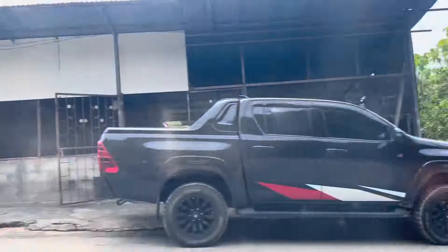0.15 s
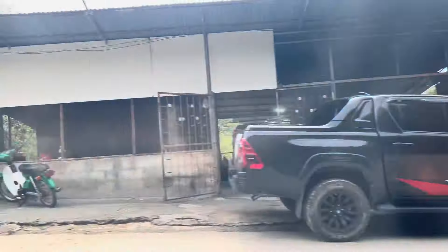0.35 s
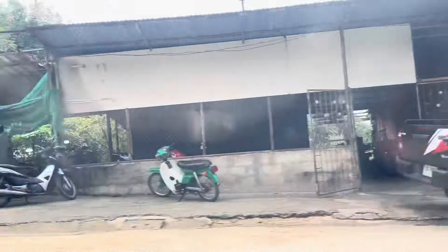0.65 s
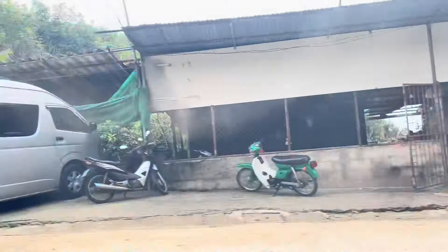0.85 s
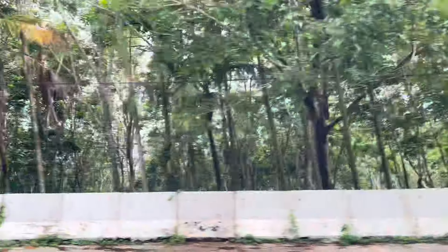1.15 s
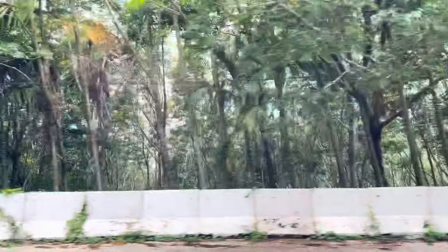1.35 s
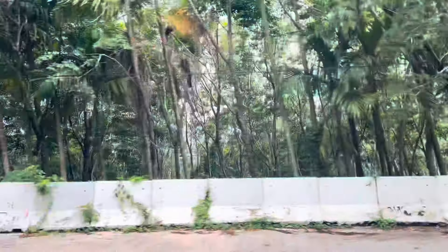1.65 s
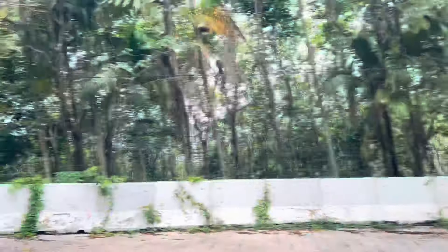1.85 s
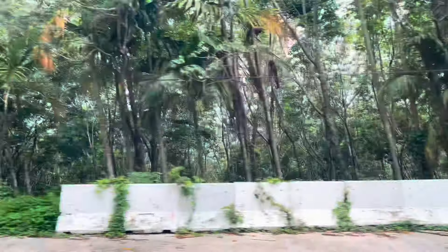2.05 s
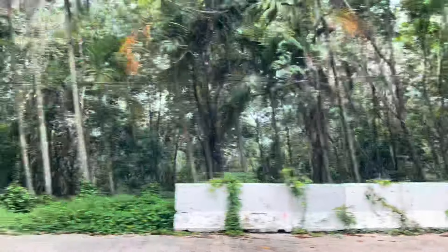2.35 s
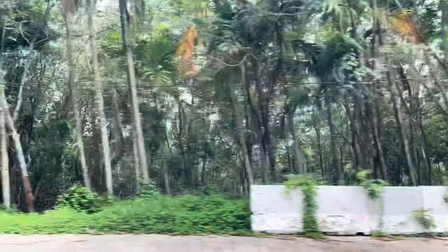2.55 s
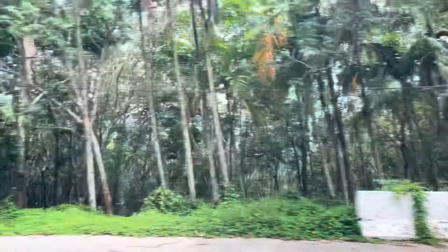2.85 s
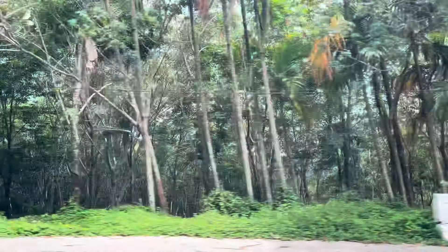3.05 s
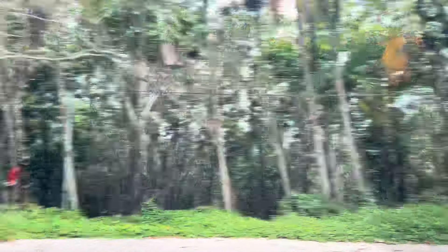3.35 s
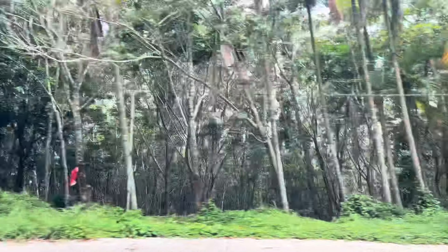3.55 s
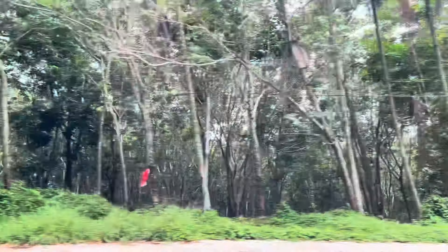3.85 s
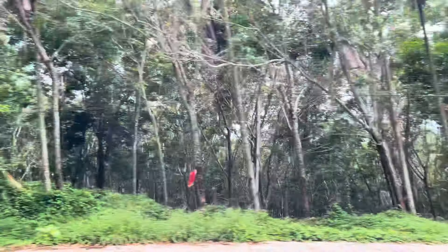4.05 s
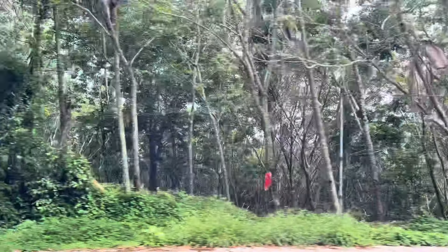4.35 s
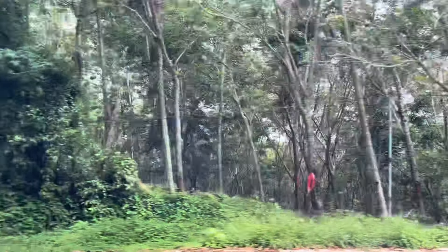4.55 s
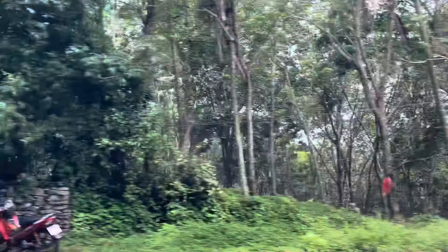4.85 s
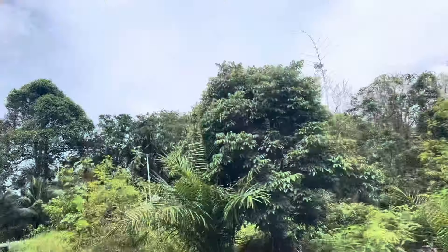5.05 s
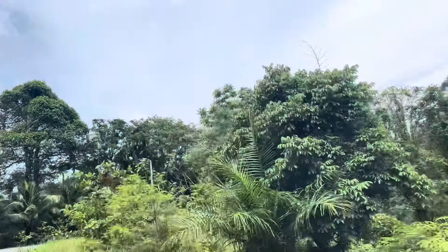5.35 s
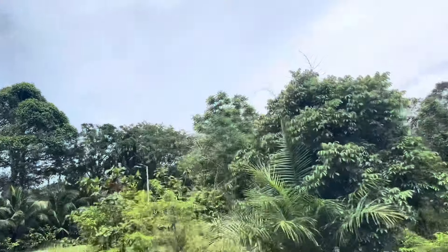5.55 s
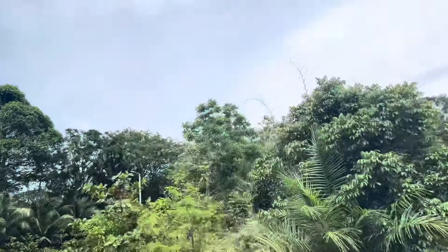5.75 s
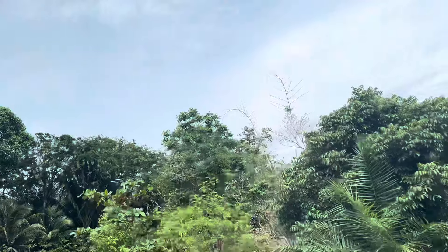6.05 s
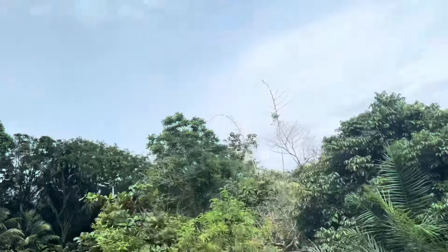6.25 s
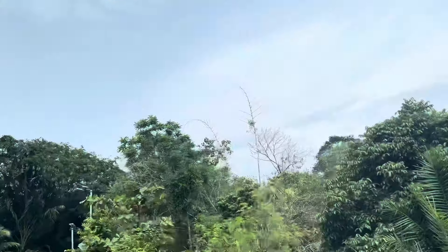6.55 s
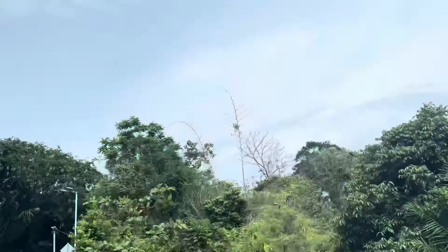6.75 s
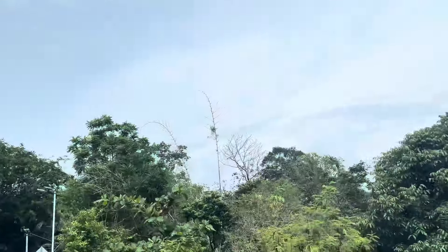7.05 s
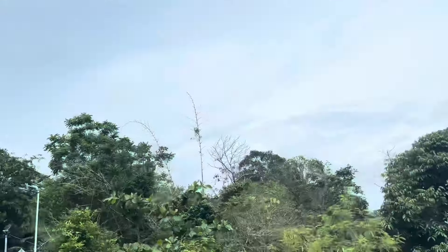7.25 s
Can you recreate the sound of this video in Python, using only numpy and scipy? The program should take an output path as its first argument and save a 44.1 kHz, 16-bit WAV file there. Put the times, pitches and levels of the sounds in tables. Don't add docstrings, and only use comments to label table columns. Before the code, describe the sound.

Bush crickets chirp in quick trills over steady cicada hiss in a forest, then a cut to low vehicle rumble with irregular knocks and rustles.

```python
import sys
import numpy as np
from scipy import signal
from scipy.fft import rfft, irfft
from scipy.io import wavfile
from scipy.ndimage import uniform_filter1d

SR = 44100
rng = np.random.default_rng(int(sys.argv[2]) if len(sys.argv) > 2 else 0)


def persist_wave(psi):
    counts = np.round(np.clip(psi, -1, 1) * 32767).astype(np.int16)
    wavfile.write(sys.argv[1], SR, np.atleast_2d(counts).T)


def boost_factor(decibels):
    exponent = np.asarray(decibels, float) / 20
    return 10 ** exponent


N = 326340
T = np.arange(N) / SR
CUT_S, CABIN_S = 4.8575, 4.8852


def band(x, hz, width_hz, order=2):
    edges_hz = [max(hz - width_hz / 2, 8), min(hz + width_hz / 2, .49 * SR)]
    return signal.sosfilt(signal.butter(order, edges_hz, "bandpass", fs=SR, output="sos"), x)


def unit(x):
    return x / np.sqrt(np.mean(x ** 2))


def walk(rate_hz):
    k = int(SR / rate_hz)
    held = np.repeat(rng.standard_normal(N // k + 1), k)
    return 1.77 * uniform_filter1d(uniform_filter1d(held, k), k)[:N]


def curves(table):
    s, *columns = np.transpose(table)
    return [boost_factor(np.interp(T, s, c)) for c in columns]


def held_level(rows, edge_s):
    total = 0
    for s, length_s, db in rows:
        inside_s = np.minimum(T - s, s + length_s - T)
        total = total + boost_factor(db) * np.clip(inside_s / edge_s + .5, 0, 1)
    return total


def hiss(hz, width_hz, flicker_db, rate_hz, order=2):
    return unit(band(rng.standard_normal(N), hz, width_hz, order) * boost_factor(flicker_db * walk(rate_hz)))


def pair(hz, width_hz, flicker_db, rate_hz, like, left_db=0):
    mid, side = hiss(hz, width_hz, flicker_db, rate_hz), hiss(hz, width_hz, flicker_db, rate_hz)
    both = np.sqrt((1 + like) / 2) * mid + np.sqrt((1 - like) / 2) * side * np.array([[1], [-1]])
    return both * boost_factor(np.array([[left_db / 2], [-left_db / 2]]))


def add(out, s, ms, db, wave, order=2):
    half = int(2.5 * ms / 1000 * SR) + 8
    i = np.arange(max(int(s * SR) - half, 0), min(int(s * SR) + half, N))
    t = i / SR - s
    out[i] += boost_factor(db) * np.exp(-2 * np.log(2) * np.abs(1000 * t / ms) ** order) * wave(t, i)


# first_s, last_s, spacing_ms, level_db, pace (stroke speed, 1 = usual)
TRILLS = [(0.024, 0.219, 47, -47, 0.73), (0.311, 0.453, 49, -58, 1), (0.765, 0.85, 44, -48.5, 0.64),
          (2.806, 2.876, 73, -45.5, 0.98), (3.074, 3.101, 40, -54.5, 0.61), (3.207, 3.364, 76, -51.5, 0.63),
          (0.552, 0.713, 165, -45.5, 0.57), (0.93, 1.325, 66, -40, 0.77), (1.384, 1.447, 59, -38.5, 1),
          (0.962, 1.29, 67, -50.5, .8), (1.491, 1.598, 111, -48, 0.8), (1.528, 1.729, 51, -43.5, 0.78),
          (1.841, 1.983, 47, -45.5, 0.87), (2.112, 2.291, 44.5, -43.5, 1), (2.397, 2.759, 72.5, -41, 0.86),
          (2.323, 2.666, 115, -49.5, 0.79), (2.965, 3.015, 46, -43.5, 0.89), (3.153, 3.152, 70, -40.5, 1),
          (3.447, 3.811, 72, -42, 1), (3.89, 3.987, 44.5, -44.5, 0.93), (4.081, 4.166, 82, -41.5, 0.97),
          (4.23, 4.501, 67, -40, 0.83), (4.57, 4.576, 60, -40, 0.77), (4.629, 4.692, 63, -38, 0.83),
          (4.763, 4.846, 40, -44, 0.75), (4.258, 4.73, 67, -57.5, 0.97)]


def chirps():
    rows = []
    for first, last, ms, db, pace in TRILLS:
        at = np.linspace(first, last, round(1000 * (last - first) / ms) + 1)
        for s, (a, b) in zip(at, rng.standard_normal((12, 2))):
            rows.append((s + .002 * a, db + 0.04 * b, pace))
    return rows


def crowd_chirps(far):
    rates_hz = np.linspace(14, 22.4, 4)[:, None]
    at = np.sort(rng.uniform(0, CUT_S, (4, 1)) + np.arange(-100, 100) / rates_hz, axis=None)
    at = at[(at > 0) & (at < CUT_S)]
    return [(s, 20 * np.log10(far[int(s * SR)]) - 6.0, .85) for s in at]


def trees(x):
    t60_s = .45
    tail_s = T[:int(.6 * SR)]
    tails = rng.standard_normal((3, len(tail_s))) * 1000 ** (-tail_s / t60_s)
    tails = tails / np.sqrt(np.sum(tails ** 2, axis=1, keepdims=True))
    return signal.fftconvolve(x[None], tails, axes=1)[:, :N]


def crickets(far):
    chirp_hz, fall_hz_per_s, chirp_ms, third_db = 3780, 17000, 20, -21
    rows = [(s, db - 8.5, pace) for s, db, pace in chirps()] + crowd_chirps(far)
    tone, third = np.zeros(N), np.zeros(N)
    for (s, db, pace), (a, b, c, *late) in zip(rows, rng.standard_normal((len(rows), 5))):
        start_hz = chirp_hz + 40 * a
        fall = pace * fall_hz_per_s * (1 + 0.06 * b)
        turn = lambda t: 2 * np.pi * (start_hz * t - fall * t ** 2 / 2) + 9 * c
        stroke = lambda t, i: np.sin(turn(t))
        add(tone, s, chirp_ms / pace, db - 0.5, stroke, order=3)
        add(third, s, chirp_ms * 0.45, db + third_db - 5.5 + 1.5 * c, lambda t, i: np.sin(3 * turn(t)))
        for k, jitter in enumerate(late):
            echo_s = s + 0.0098 * (k + 1) + 0.0034 * jitter
            add(tone, echo_s, chirp_ms / pace, db - 14.5 - 3.5 * k, stroke, order=4)
    uneven_teeth = 1 + 0.17 * hiss(142, 240, 0, 1)
    tone = band(tone * uneven_teeth, 3815, 800)
    wet = trees(tone + .7 * third)
    near = tone + boost_factor(-8) * wet[0]
    left = boost_factor(-1.0) * near + boost_factor(5.5) * third
    right = boost_factor(3.5) * near + boost_factor(7.5) * np.roll(third, -1)
    return np.array([left, right]) + boost_factor(-22.0) * wet[1:]


# first_s, last_s, spacing_ms, level_db
ZIPS = [(.032, 0.21, 46, -72.5), (0.31, .453, 49, -71.5), (0.544, 0.55, 40, -70), (0.717, .978, 44, -71),
        (1.5, 1.58, 41, -70.5), (1.645, 1.65, 44, -72), (1.713, 2.2, 44, -72), (2.073, 2.158, 44, -71),
        (2.222, 2.225, 44, -66), (2.284, 2.733, 44.7, -69), (2.81, 2.81, 44, -68.5), (2.863, 3.5, 47, -70),
        (3.258, 3.299, 38, -67), (3.406, 3.529, 40, -69), (3.895, 4.089, 47, -68.5),
        (4.173, 4.578, 45.3, -69.5), (4.676, 4.804, 43, -70)]


def zips():
    zip_hz, zip_ms, fall_hz_per_s = 11300, 12, 45000
    voice = np.zeros(N)
    for first, last, ms, db in ZIPS:
        at = np.linspace(first, last, round(1000 * (last - first) / ms) + 1)
        for s, (a, b, c) in zip(at, rng.standard_normal((12, 3))):
            stroke = lambda t, i: np.sin(2 * np.pi * ((zip_hz + 200 * c) * t - fall_hz_per_s * t ** 2 / 2))
            add(voice, s + .002 * a, zip_ms, db + 1.5 * b, stroke, order=4)
    voice = voice * (1 + 0.17 * hiss(230, 500, 0, 1))
    return np.array([voice, np.roll(voice, -1)])


def chorus(answer):
    out = boost_factor(-60) * pair(6950, 606, 0.23, 30, 0.22, 1.9)
    out = out + boost_factor(-76) * pair(2200, 160, 1, 18, .5, -1.1)
    out = out + answer * pair(2320, 120, 1.9, 24, 0.24)
    out = out + boost_factor(-73.0) * pair(3460, 400, 1.5, 23, 0.83)
    out = out + boost_factor(-84) * pair(7700, 900, 1.0, 8.8, 0.33)
    return out + boost_factor(-74.0) * pair(4270, 660, 0.94, 28, 0.85, -1.9)


# start_s, length_s, level_db
WHISTLE = [
    (2.2, 0.045, -77),
    (3.77, .07, -79),
    (3.87, 0.11, -75.5),
    (3.995, .2, -74.5),
    (4.2, .07, -79),
    (4.33, .035, -78),
    (4.455, .09, -79.5),
    (4.57, 0.045, -81.5),
    (4.695, .03, -71),
    (4.795, 0.035, -74.5),
]


def whistle():
    pitch_hz = 4630 + 14.9 * walk(25)
    held = np.sin(2 * np.pi * np.cumsum(pitch_hz) / SR) * boost_factor(0.4 * walk(22))
    ears = boost_factor(6.0) * held * boost_factor(np.array([[-.7], [.7]]))
    breath = boost_factor(-14.5) * pair(4630, 54, 0.55, 11, 0.44, -1.6)
    return held_level(WHISTLE, 0.013) * (ears + breath)


# centre_s, level_db, pitch_hz, length_ms
HOOTS = [
    (0.139, -79.5, 1483, 28),
    (1.238, -80, 1510, 32),
    (2.55, -88, 2280, 47),
]


def bird():
    out = np.zeros(N)
    for s, db, hz, ms in HOOTS:
        add(out, s, ms, db, lambda t, i: np.sin(2 * np.pi * hz * t) + 3.0 * np.sin(4.1 * np.pi * hz * t))
    return out


# freq_hz, density_db (per Hz)
AIR = [(40, -2.5), (110, -7), (230, -3.5), (550, -10), (1500, -5), (3000, 0), (5500, -3.5), (9500, -8),
       (12500, -6.5), (15500, -8)]


def forest_air():
    freq_hz = np.fft.rfftfreq(N, 1 / SR)
    hz, db = np.transpose(AIR)
    colour = boost_factor(np.interp(np.log(freq_hz + 1), np.log(hz), db))
    shared, own = rng.standard_normal(N), rng.standard_normal((2, N))
    share = 0.45 + 0.57 * (freq_hz > 8000)
    return boost_factor(-69) * unit(irfft((rfft(shared) * share + rfft(own)) * colour, N))


# time_s, far_crickets_db, low_singer_neighbour_db
FOREST = [
    (0, -51, -83),
    (1, -52, -101),
    (2, -51.5, -99),
    (3, -53, -99),
    (3.6, -55, -98),
    (3.9, -55, -76),
    (4.4, -50, -76.5),
    (4.86, -55.5, -79.5),
]


def forest():
    far, answer = curves(FOREST)
    out = crickets(far) + zips() + chorus(answer) + whistle() + bird() + forest_air()
    return out * np.clip((CUT_S - T) / 0.00063, 0, 1)


def pop():
    ms = 1000 * np.maximum(T - CABIN_S, 0)
    step = .042 * np.exp(-(ms / .95) ** 2)
    build = .066 * (ms / 5.6) ** 1.2 / (1 + np.exp(np.minimum((ms - 6.35) / .22, 50)))
    return step + build


def road_boom():
    rumble = hiss(70, 30, 0.81, 16, order=1)
    rumble = rumble + boost_factor(-3.5) * hiss(45, 30, 0.9, 12, order=1)
    rumble = rumble + boost_factor(-6) * hiss(105, 40, 1, 14, order=1)
    return unit(band(rumble, 170, 320))


# widest_s, peak_db, pitch_hz, length_ms
KNOCKS = [(4.9081, -46, 398, 5.7), (4.9139, -41, 370, 3.1), (5.0018, -43, 196, 8.3),
          (5.2653, -39.5, 344, 4.4), (5.284, -49, 211, 18), (5.3253, -36, 194, 8.5), (5.342, -46, 200, 3.6),
          (5.427, -45, 191, 3.7), (5.7446, -50, 198, 11), (5.766, -40, 180, 8), (5.781, -50.5, 190, 6.8),
          (5.822, -50, 180, 6.7), (5.847, -29, 160, 6.2), (5.8597, -21.5, 162, 7.9),
          (5.8655, -37.5, 313, 3.2), (5.8500, -42.5, 323, 8.3), (5.9061, -42, 220, 9.6),
          (7.3906, -55, 300, 10), (6.1844, -41, 183, 3.5), (6.2392, -47, 145, 4), (6.259, -51, 166, 13),
          (6.2972, -42, 380, 1.8), (6.4815, -44, 275, 7), (6.4957, -39, 205, 6.3), (6.5077, -44, 304, 9),
          (6.5065, -42, 172, 8), (6.5287, -36.5, 202, 10), (6.549, -44, 213, 4.3), (6.721, -48, 173, 3.3),
          (6.7894, -45, 186, 9.5), (6.874, -42.5, 168, 6.4), (6.156, -46.5, 165, 11), (7.0, -35, 316, 13),
          (7.0245, -48, 206, 2.5), (7.0443, -39, 301, 11), (7.0569, -44, 245, 18), (7.0816, -42, 202, 10),
          (7.1454, -43, 304, 9), (7.158, -47, 305, 25), (7.2778, -38, 172, 4.6), (7.2825, -44, 300, 18),
          (7.2954, -34, 407, 6), (7.303, -27, 193, 8), (7.325, -40, 179, 11), (7.3449, -39.5, 185, 8.2),
          (4.9211, -49.5, 433, 2.7), (4.968, -53, 244, 10.6), (5.605, -56.5, 190, 8.4),
          (5.8906, -46, 250, 11), (7.261, -55, 170, 8)]


def panel_knocks():
    out = np.zeros(N)
    for s, db, hz, ms in KNOCKS:
        add(out, s, ms, db, lambda t, i: np.cos(2 * np.pi * hz * t * (1 + 3.1 * t)))
    return out


def after(x, db, tau_s):
    keep = np.exp(-2 / (tau_s * SR))
    return boost_factor(db) * np.sqrt(signal.lfilter([1 - keep], [1, -keep], x ** 2))


# freq_hz, width_hz, level_db
PANELS = [(184.3, 79, -2), (256.3, 9.9, -5.5), (303.3, 54, -2), (434, 74, -7.5), (530, 76, -17.5)]


def panel_drone():
    return unit(sum(boost_factor(db) * hiss(hz, width_hz, 1.2, 30) for hz, width_hz, db in PANELS))


def burst(grit, i, hz, width_hz, order=2):
    return unit(band(grit[i[0]:i[-1] + 1001], hz, width_hz, order)[1000:])


# centre_s, peak_db, pitch_hz, length_ms
CREAKS = [(5.003, -66.5, 1340, 11), (5.846, -45, 1070, 3.5), (6.996, -52, 600, 3.6),
          (6.183, -46.5, 476, 8.9), (6.775, -54, 834, 14), (5.33, -76, 900, 8.7), (5.307, -66, 695, 51),
          (5.442, -60, 1340, 16), (5.766, -61, 1040, 4.3), (5.858, -48, 1040, 3.8),
          (5.864, -40.5, 990, 2.1), (5.896, -42.5, 562, 8.6), (5.893, -55, 920, 4.3),
          (5.977, -62, 910, 5.7), (6.115, -69, 960, 7.5), (6.67, -69, 930, 6.2), (6.081, -58, 680, 13),
          (6.165, -57.5, 1530, 4.5), (6.184, -54, 770, 8.7), (6.243, -56, 850, 4.4),
          (6.302, -46, 1750, 6.6), (6.486, -49, 773, 10.4), (6.534, -53, 684, 3.9), (6.685, -55, 745, 6.5),
          (6.768, -51, 1630, 10), (6.824, -55.5, 1650, 7.8), (7.011, -49.5, 528, 33),
          (7.085, -59.1, 665, 3.4), (7.143, -62, 830, 8.9), (7.194, -59, 720, 28), (7.281, -56, 800, 3),
          (7.3, -52, 640, 3.3), (7.333, -51, 646, 7.6), (5.66, -71, 1360, 5.7), (5.728, -62, 910, 4),
          (6.716, -74, 900, 4), (7.107, -77, 1090, 4), (6.264, -48, 516, 9.5), (6.302, -55, 900, 13),
          (6.206, -57.5, 1680, 5.7), (7.018, -57, 1750, 3.4)]


def trim_creaks():
    out, grit = np.zeros(N), rng.standard_normal(N + 2000)
    for s, db, hz, ms in CREAKS:
        add(out, s, ms, db - 9.5, lambda t, i: burst(grit, i, hz, 0.18 * hz))
    return out


def trim_rustle():
    low, middle = hiss(720, 450, 3.5, 60), hiss(1000, 200, 3, 60)
    return unit(low + boost_factor(-3) * middle + boost_factor(-3) * hiss(1600, 1100, 3.5, 60))


# centre_s, peak_db, pitch_hz, treble_share_db
TICKS = [(4.973, -66, 6400, 3), (4.998, -43.5, 6200, -30), (5.15, -68, 6400, 4), (5.222, -56, 5050, 3),
         (5.265, -62, 4120, 0), (5.274, -42, 5470, -5), (5.431, -62, 13200, 9), (5.445, -42, 3600, -8),
         (5.452, -46, 2790, -12), (5.511, -65, 4700, -9), (5.608, -56, 9400, -2), (5.728, -67, 4600, 12),
         (5.779, -54, 5800, 1.5), (6.486, -48.5, 2940, -8), (6.497, -52, 3800, -12),
         (6.535, -50.5, 4100, -34), (6.742, -41.5, 4530, -3.5), (6.75, -40, 4940, -17),
         (6.811, -52, 5430, -23), (6.844, -53, 4330, -38), (6.856, -55, 9400, 9), (7.063, -52, 4100, -11),
         (7.08, -44, 4660, -3.5), (7.107, -52, 3670, -27), (7.219, -54, 4630, -15), (7.253, -70, 4185, -21),
         (7.266, -39.5, 12900, -0.5), (7.311, -51, 4360, -24), (7.355, -38, 7300, -2.5),
         (7.39, -60, 2360, -32), (5.602, -66, 12000, 0), (5.757, -62, 9600, 4), (5.797, -57, 7400, -2),
         (5.825, -65.5, 5000, 5), (5.94, -65.5, 2700, -23), (6.162, -62, 3550, -1), (6.191, -57, 4000, -17),
         (6.206, -58, 4300, -1), (6.217, -67, 9500, 5), (6.247, -60, 2730, -8), (6.26, -54.5, 4100, -15),
         (6.295, -64, 2150, 4), (6.325, -60.5, 6500, 3), (6.504, -60, 3900, -4), (6.61, -64, 3300, -1),
         (6.628, -66, 3750, -13), (6.726, -56, 4480, -8), (6.97, -63, 3950, -26), (7.12, -54.5, 4240, -11),
         (7.201, -63, 4100, -15)]


def case_ticks():
    out, grit = np.zeros(N), rng.standard_normal(N + 2000)
    crisp = unit(band(grit, 9150, 12000))
    for s, db, hz, treble_db in TICKS:
        ms = 3.2 * (4500 / hz) ** 0.81
        snap = lambda t, i: burst(grit, i, hz, 0.066 * hz, order=1) + boost_factor(treble_db) * crisp[i]
        add(out, s, ms * 1.05, db - 14.5, snap)
        add(out, s, ms * 2.6, db - 21, lambda t, i: snap(t, i) * (t > 0))
    add(out, 4.906, .15, -70, lambda t, i: 1)
    return out


# start_s, length_s, cloth_hiss_db, trim_rustle_db
RUBS = [(4.965, 0.023, -103, -84), (5.137, 0.035, -88, -108), (5.216, .014, -81, -95),
        (5.224, 0.061, -83, -91), (5.302, 0.042, -90, -76), (5.257, 0.016, -77, -102),
        (5.394, 0.089, -77.5, -78), (5.504, 0.017, -74, -100), (5.588, 0.048, -80.5, -81),
        (5.645, 0.032, -84, -85), (5.722, 0.11, -80, -77.5), (5.923, 0.096, -91, -85),
        (6.056, 0.093, -88, -76), (6.153, 0.19, -75.5, -78.5), (6.393, 0.16, -84, -111),
        (6.478, 0.078, -86, -68.5), (6.568, 0.14, -85.5, -76.5), (6.709, 0.18, -77, -77),
        (7, 0.036, -85, -74), (6.897, 0.15, -96, -85), (5.833, 0.045, -78.5, -97), (6.346, 0.082, -89, -87),
        (7.139, 0.046, -101, -74), (5.334, 0.05, -85, -81.5), (5.54, 0.055, -88, -110),
        (7.053, 0.096, -82.5, -72.5), (7.222, 0.14, -76.5, -69), (7.381, 0.041, -74, -67)]


def hand_levels():
    edge_s, cloth_rest_db = 0.016, -99.5
    cloth = boost_factor(cloth_rest_db) + held_level([row[:3] for row in RUBS], edge_s)
    lean = held_level([(s, length_s, db) for s, length_s, _, db in RUBS], edge_s)
    return cloth, lean


# freq_hz, width_hz, level_db
CLOTH = [(2630, 1800, -7.5), (4100, 1700, -1.5), (6500, 1900, -29.5), (13500, 1100, -9)]


def cloth_hiss():
    slips = uniform_filter1d(1. * (rng.random(N) < 250 / SR), 40) * 40
    fibres = rng.standard_normal(N) * (1 + 1.4 * slips)
    bands = [boost_factor(db + walk(33)) * unit(band(fibres, hz, width_hz, order=1)) for hz, width_hz, db in CLOTH]
    return unit(sum(bands))


# start_s, length_s, level_db
SHEEN = [
    (6.395, 0.126, -75),
    (6.665, .014, -77),
    (7.06, .03, -85),
    (5.5, .015, -88),
    (7.375, .03, -84),
    (6.4, 0.09, -84),
]


def fingertip():
    return held_level(SHEEN, 0.016) * hiss(15800, 5500, 3.1, 60)


def cabin_air(boom, jolt):
    tyres = hiss(1760, 1600, 2.8, 46) + boost_factor(0.5) * hiss(4020, 2100, 6.9, 40)
    out = boost_factor(-55.5) * boom ** 0.55 * jolt * tyres
    out = out + boost_factor(-73) * boom ** .3 * hiss(10500, 7500, 2, 25)
    out = out + boost_factor(-75) * boom ** .3 * hiss(9550, 260, 2.8, 80)
    return out + boost_factor(-101) * hiss(4600, 8100, 0.75, 24, order=1)


# time_s, boom_db
ROAD = [(4.94, -70), (5.12, -76.5), (5.42, -60.5), (5.67, -72), (5.77, -54.5), (5.86, -54), (5.92, -52.5),
        (6.04, -63), (6.28, -54.5), (6.4, -58.5), (6.5, -54), (6.61, -58), (6.93, -57.5), (7.05, -52),
        (7.2, -58), (7.4, -49.5)]


def cabin():
    boom, = curves(ROAD)
    cloth, lean = hand_levels()
    knocks = panel_knocks()
    jolt = boost_factor(3 * walk(45))
    drone = boost_factor(-13) * boom + boost_factor(14) * lean + after(knocks, -22, 0.024)
    rustle = boost_factor(-41.5) * boom + lean
    out = boom * road_boom() + knocks + drone * jolt * panel_drone()
    out = out + trim_creaks() + rustle * jolt * trim_rustle()
    out = out + case_ticks() + cloth * cloth_hiss() + fingertip()
    out = out + cabin_air(boom, jolt)
    dull = signal.butter(4, 13800, fs=SR, output="sos")
    return (signal.sosfilt(dull, out) + pop()) * (T >= CABIN_S)


def scene():
    return forest() + cabin()


def top_cut(x):
    return signal.sosfilt(signal.butter(12, 16180, fs=SR, output="sos"), x)


def record(dry):
    top = signal.ellip(10, .3, 60, 15440, fs=SR, output="sos")
    floor = boost_factor(-125) * rng.standard_normal(N)
    return top_cut(signal.sosfilt(top, dry) + floor)


dry = scene()
out = record(dry)
persist_wave(out)
```